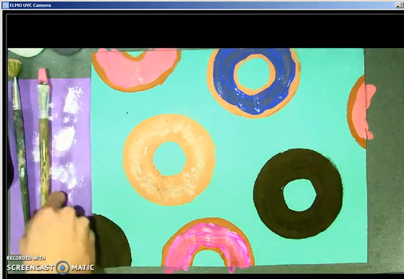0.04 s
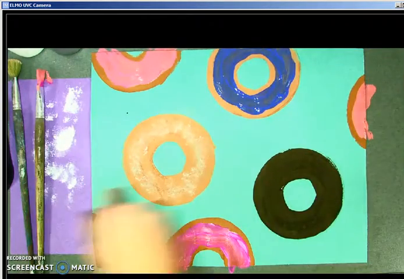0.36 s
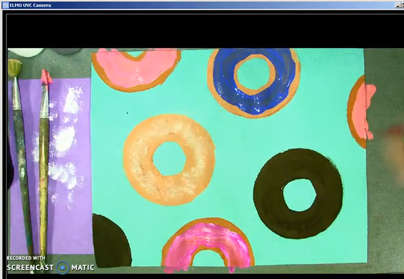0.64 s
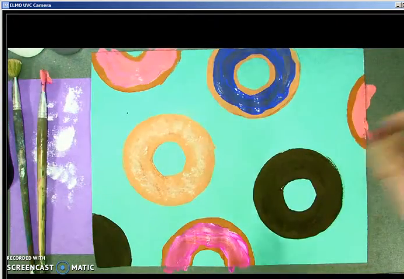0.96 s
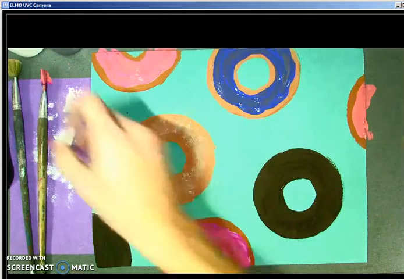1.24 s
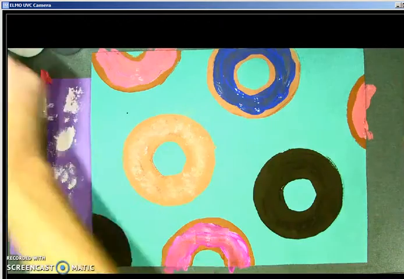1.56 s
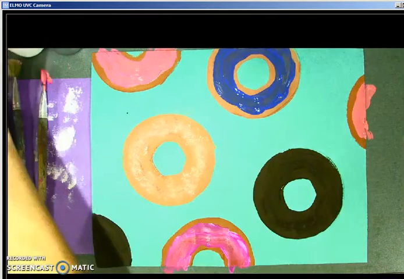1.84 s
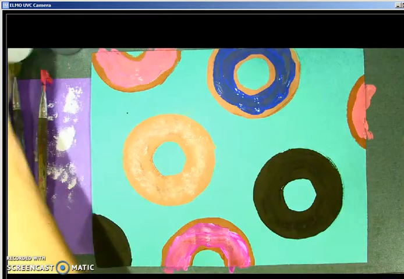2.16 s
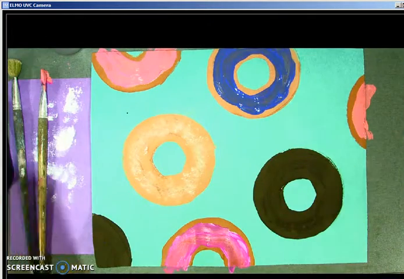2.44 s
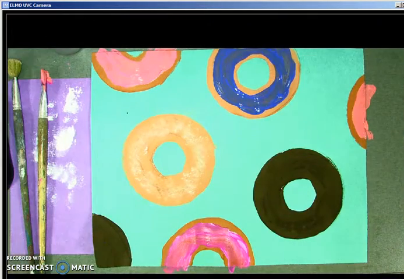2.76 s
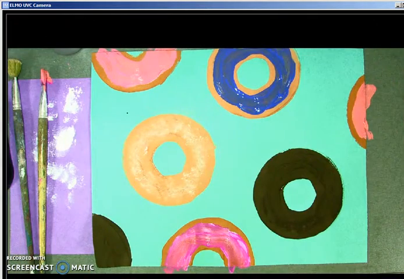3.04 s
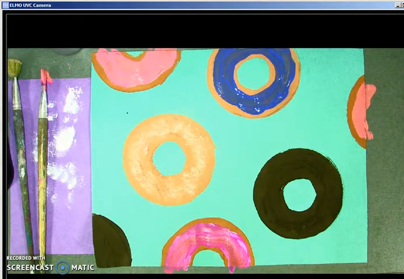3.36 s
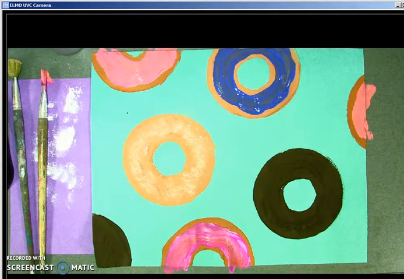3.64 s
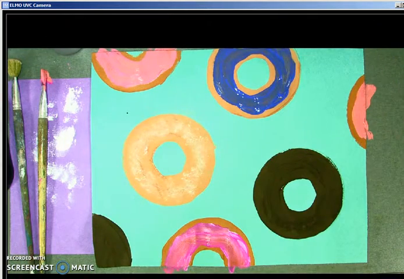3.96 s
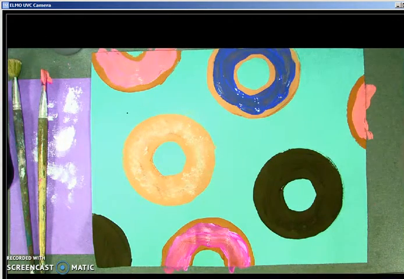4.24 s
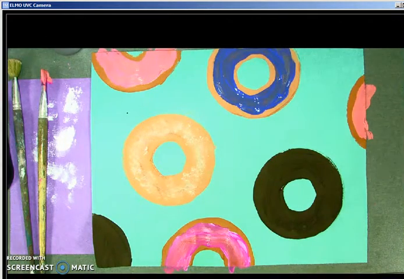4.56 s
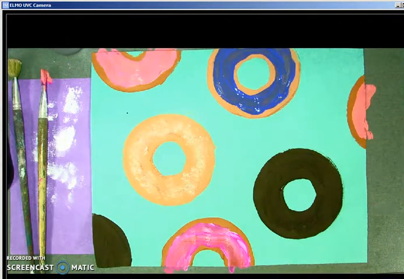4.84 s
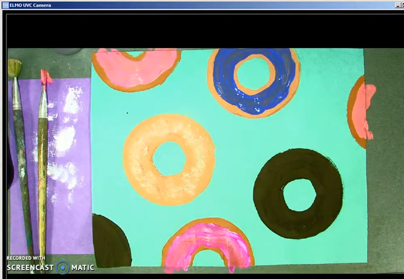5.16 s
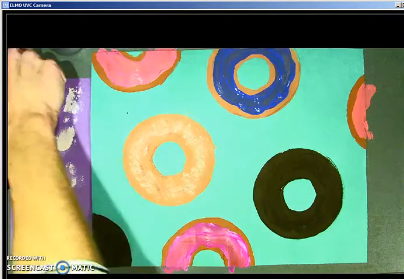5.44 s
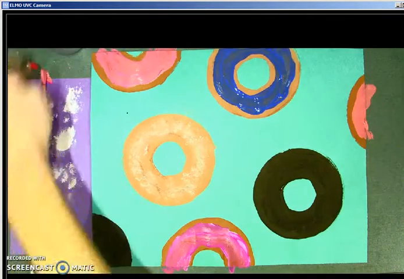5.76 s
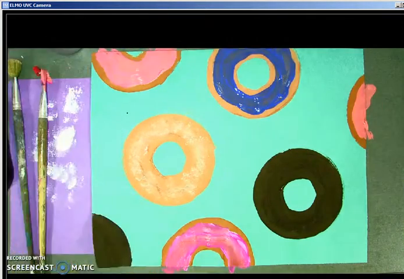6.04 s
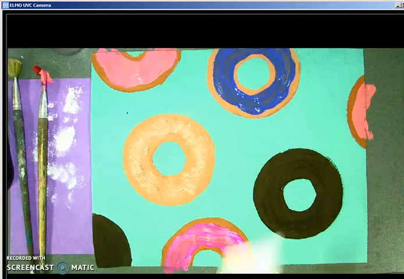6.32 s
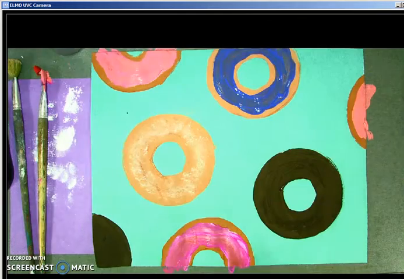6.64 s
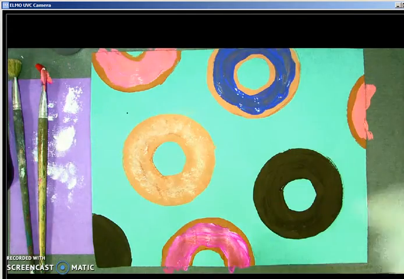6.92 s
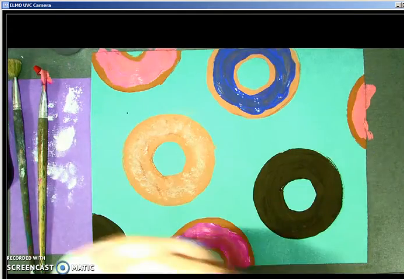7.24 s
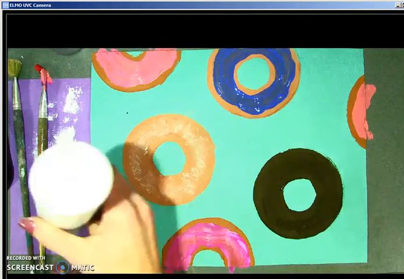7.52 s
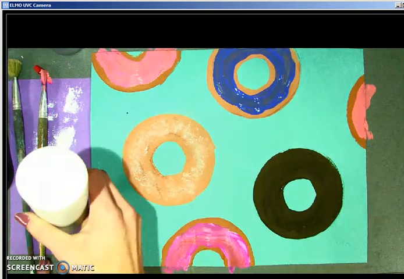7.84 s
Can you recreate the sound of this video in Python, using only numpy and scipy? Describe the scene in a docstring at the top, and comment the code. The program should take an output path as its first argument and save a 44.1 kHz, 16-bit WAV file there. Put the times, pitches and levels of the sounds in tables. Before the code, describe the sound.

Over a low room hum, art supplies are handled on a table with light clicks, a sharp clack, soft booms and one loud knock.

```python
"""Ventilation rumbles from the start, with a faint pulsing whine and the soft boom of a table leant on.
Paintbrushes tick, a handle drops and bounces, and hands slide over paper with a frictional hiss.
Hard pieces scrape and clack; later a hollow container is knocked down, overloading the mono microphone.
Near the end a pot is taken up with a squeak and a pop. Each struck body rings in its damped normal
modes, while the brief contact itself radiates broadband noise."""
import sys
import numpy as np
from scipy import signal
from scipy.fft import rfft, irfft
from scipy.io import wavfile
from scipy.ndimage import uniform_filter1d

SR = 44100
rng = np.random.default_rng(int(sys.argv[2]) if len(sys.argv) > 2 else 0)


def waveform_to_disk(signal):
    """Save audio, clipped to [-1, 1], as 16-bit WAV at the path in sys.argv[1]."""
    frames = np.transpose(np.atleast_2d(signal))
    scaled = np.clip(frames, -1, 1) * 32767
    samples = np.round(scaled).astype(np.int16)
    wavfile.write(sys.argv[1], SR, samples)


N = 356460
TIME = np.arange(N) / SR
RING = TIME[:SR // 4]  # time axis of one blow

# spectrum of moving air and microphone hiss: f/Hz, relative level/dB
AIR_SPECTRUM = [(11, -39), (18, 4), (33, -1.5), (52, -1.5), (63, -7), (86, -3.5), (139, -6), (170, -10.5),
                (196, -16), (232, -14), (422, -19), (529, -17), (1080, -34.5), (6090, -41.5), (8090, -42),
                (8810, -42), (16000, -42)]
# duct resonances: f/Hz, width/Hz, level/dB
DUCT_RESONANCES = [(49, 5.7, -50), (168.7, 16, -60), (537.5, 70, -59.5)]
# arms leaning on the table: t/s, duration/s, boom gain/dB
ARM_LEANS = [(0.048, 1.17, -37.5), (0.654, .11, -28), (2.0, 0.63, -38), (3.534, 0.33, -42.5),
             (4.276, 2.04, -41), (6.07, .46, -27), (6.554, 0.18, -30), (6.79, .33, -37),
             (7.168, 0.39, -44.5)]
# trains of whine pulses: start/s, end/s, period/s
WHINE_TRAINS = [(.028, 4.6, .1447), (4.711, 5.9, .1442), (6.061, 8.05, .144)]
# light ticks of the brushes: t/s, level/dB, centre f/Hz
BRUSH_TICKS = [(0.0662, -45, 4050), (1.1357, -47, 7000), (1.149, -38.5, 9000), (1.2016, -38, 6500),
               (2.795, -46, 3000), (5.2716, -44, 7000), (5.287, -44.5, 7000), (5.3207, -46.5, 3500),
               (5.8048, -37, 3480), (5.8114, -34, 3800), (5.879, -35.5, 4500), (5.885, -42, 2980),
               (5.934, -48, 2500), (5.947, -45, 4000), (7.036, -38.5, 4500), (7.0428, -45, 5500),
               (7.0468, -38.5, 3470), (7.056, -35.5, 3380)]
# soft bumps on the table: t/s, f/Hz, level/dB, Gaussian half-width/s
TABLE_BUMPS = [(0.116, 65, -20, 0.0078), (0.53, 79.5, -24.5, 0.011), (0.998, 77.5, -23.5, 0.028),
               (2.305, 83, -23, 0.017), (3.924, 43.8, -22.5, 0.014), (6.915, 77.5, -28, 0.011),
               (7.349, 323, -35.5, 0.0028)]
# a handle's fall and bounces: t/s, handle level/dB, table level/dB, contact level/dB
HANDLE_TAPS = [(0.2483, -7, -13.5, -31.5), (0.2582, -25, -19, -37), (0.2997, -25.5, -27, -38)]
# modes of the handle and of the table: f/Hz, relative level/dB, T60/s
HANDLE_MODES = [(3082, -9.5, 0.011), (3155, -9, .012), (5720, -2.5, 0.0066)]
TABLE_MODES = [(277, 2, 0.093), (342, 9, 0.073), (768, -7.5, 0.063)]
# strokes over paper: middle t/s, duration/s, level/dB, centre f/Hz
PAPER_STROKES = [(1.516, 0.19, -57, 11500), (1.861, 0.53, -61, 3560), (2.807, 0.18, -59, 4500),
                 (3.015, 0.092, -56, 5430), (4.453, 0.12, -52, 6100), (4.539, 0.71, -59, 4230),
                 (5.991, 0.49, -58, 5400), (6.233, .17, -49.5, 6140), (6.387, 0.11, -52.5, 7500),
                 (6.824, 0.25, -59.5, 4600), (7.723, 0.31, -61, 9050)]
# hard pieces colliding: t/s, level/dB, relative crack level/dB
COLLISIONS = [(2.5617, -29, -8), (2.5805, -27, -7), (2.5843, -22.5, -9), (2.6172, -10.5, -16.5),
              (2.6288, -36.5, -7), (2.6302, -6, 7), (2.6319, -1.5, -3)]
# modes of those pieces: f/Hz, relative level/dB, T60/s
PIECE_MODES = [(812, -10, 0.04), (2880, -10.5, 0.023), (3524, -6, 0.019), (4470, -6.5, 0.021),
               (4950, -5.5, 0.03), (5580, -3, 0.025), (6060, -0.5, 0.009), (7700, -10, 0.02),
               (10300, -9, 0.014)]
# spectrum of their contact: f/Hz, relative level/dB
CLACK_SPECTRUM = [(300, -34.5), (600, -22), (830, -19), (1100, -30), (2200, -20.5), (2900, -7), (3900, -22),
                  (4800, 4), (6200, 5), (8700, -14), (12000, -15.5), (16000, -12)]
# a container landing on one edge, then flat: t/s, body level/dB, crack level/dB
LANDINGS = [(5.0405, -6.5, -20), (5.0427, 5, -2)]
# modes of its hollow body: f/Hz, relative level/dB, T60/s
BODY_MODES = [(507, -0.5, 0.045), (550, 2.5, 0.039), (613, -6.5, 0.06), (776, -10, 0.066)]
# modes of its thin wall: f/Hz, relative level/dB
WALL_MODES = [(3265, -0.5), (4255, 6), (5040, 4), (5300, 3), (5800, 5), (5965, 1), (7745, -5), (9860, -4)]
# spectrum of its contact: f/Hz, relative level/dB
KNOCK_SPECTRUM = [(100, -13), (170, -34), (250, -3), (380, -19), (600, -13), (950, -16), (1600, -17.5),
                  (2200, -20), (3400, -21), (5900, -20), (7000, -28), (10000, -21.5), (16000, -38)]
# pop of a lifted pot, ahead of its cavity filter: t/s, f/Hz, level/dB, Gaussian half-width/s
POT_POP = [(7.0603, 1200, -11, 0.00098)]


def undb(db):
    """Decibels to amplitude ratio."""
    return 10 ** (np.asarray(db) / 20)


def unit(x):
    """Normalisation to rms 1."""
    return x / np.sqrt(np.mean(x ** 2))


def add(out, s, sound):
    """Superposition: a sound joins the mix at time s."""
    i = max(int(s * SR), 0)
    out[i:i + len(sound)] += sound[:N - i]


def edge(x, hz, kind, order=4):
    """Butterworth filtering, low-pass or high-pass."""
    return signal.sosfilt(signal.butter(order, min(hz, .48 * SR), kind, fs=SR, output="sos"), x)


def frequencies(size):
    """Fourier bin frequencies, floored at 1 Hz."""
    return np.maximum(np.fft.rfftfreq(size, 1 / SR), 1)


def noise(points, size):
    """Spectral shaping of white noise by points of f/Hz, level/dB."""
    hz, db = np.transpose(points)
    gain = undb(np.interp(np.log(frequencies(size)), np.log(hz), db))
    return unit(irfft(rfft(rng.standard_normal(size)) * gain, size))


def band(hz, width, size, order=1):
    """Random excitation of a resonance; order 2 steepens the skirts."""
    f = frequencies(size)
    response = 1 / (1 + 1j * (f / hz - hz / f) * hz / width)
    return unit(irfft(rfft(rng.standard_normal(size)) * response ** order, size))


def fade(t60, rise):
    """Impact envelope: growth during contact, then exponential decay."""
    return (1 - np.exp(-RING / rise)) * np.exp(-np.log(1000) * RING / t60)


def ring(modes, rise, detune):
    """Free vibration: a sum of damped modes, slightly detuned at each blow; peak 1."""
    y = np.zeros(len(RING))
    for hz, db, t60 in modes:
        detuned_hz = hz * (1 + detune * rng.standard_normal())
        y += undb(db) * fade(t60, rise) * np.sin(2 * np.pi * detuned_hz * RING)
    y *= 1 - np.exp(-RING / rise)
    return y / np.abs(y).max()


def bursts(rows):
    """Gaussian tone bursts: the shorter the burst, the wider its spectrum."""
    out = np.zeros(N)
    t = RING - RING.mean()
    for s, hz, db, half_width in rows:
        envelope = np.exp(-(t / half_width) ** 2 / 2)
        add(out, s - RING.mean(), undb(db) * envelope * np.cos(2 * np.pi * hz * t))
    return out


def ventilation():
    """Duct resonances colour a steady rumble of air, over microphone hiss."""
    ducts = sum(undb(db) * band(hz, width, N, order=2) for hz, width, db in DUCT_RESONANCES)
    return undb(-41.5) * noise(AIR_SPECTRUM, N) + ducts


def arm_weight(attack_s=0.035, release_s=0.047, resting_db=-46.5):
    """Incoherent addition: leans build, hold and let go, and their powers sum."""
    power = undb(resting_db) ** 2
    for s, length, db in ARM_LEANS:
        press = np.clip((TIME - s) / attack_s, 0, 1)
        release = np.clip(1 - (TIME - s - length) / release_s, 0, 1)
        power += (undb(db) * press * release) ** 2
    return np.sqrt(power)


def table_boom(hz, waver_hz, flutter_db):
    """Forced vibration: moving arms keep the table's lowest mode ringing unevenly, amid rumble."""
    weight = arm_weight() * undb(flutter_db * band(7, 8, N, order=2))
    phase = 2 * np.pi * np.cumsum(hz + waver_hz * band(8.7, 12, N, order=2)) / SR
    tone = np.sqrt(2) * (np.sin(phase) + undb(-18.5) * np.sin(2 * phase))
    rumble = undb(-14) * band(111, 82, N, order=2) + undb(-7.5) * band(41, 22, N, order=2)
    return weight * (undb(-2) * tone + rumble)


def whine(hz, db, pulse_s, jitter_s):
    """Gating of a pure tone: a thin electronic whine in slightly uneven pulses."""
    out = np.zeros(N)
    pulse = undb(db) * np.sin(2 * np.pi * hz * TIME[:int(pulse_s * SR)])
    for start, end, period in WHINE_TRAINS:
        for s in np.arange(start, end, period):
            add(out, s + jitter_s * rng.standard_normal(), pulse)
    return out


def brush_ticks():
    """Heavy damping leaves light contacts unpitched; higher ones reach further into the treble."""
    out = np.zeros(N)
    for s, db, hz in BRUSH_TICKS:
        click = edge(band(hz, 1.9 * hz, len(RING)), 8000 + 0.72 * hz, "low", order=8)
        add(out, s, undb(db) * click * fade(0.026, 0.000073))
    return out


def table_bumps():
    """A soft contact excites only low frequencies, for a few cycles."""
    return bursts(TABLE_BUMPS)


def brush_taps():
    """Impact excites the handle's bending modes; the heavier table answers a moment later."""
    out = np.zeros(N)
    for s, handle_db, table_db, contact_db in HANDLE_TAPS:
        contact = edge(band(3500, 5000, len(RING)), 6800, "low", order=2) * fade(0.05, 0.000098)
        handle = ring(HANDLE_MODES, rise=0.016, detune=0.0024)
        table = edge(ring(TABLE_MODES, rise=0.0015, detune=0.0032), 202, "high")
        add(out, s, undb(handle_db) * handle)
        add(out, s + 0.00051, undb(contact_db) * contact)
        add(out, s + 0.00295, undb(table_db) * table)
    return out


def paper_slides(grain_db):
    """Friction: skin catches on paper fibres, and a grainy hiss swells and fades with each stroke."""
    out = np.zeros(N)
    for middle, length, db, hz in PAPER_STROKES:
        size = int(length * SR)
        stroke = np.sin(np.linspace(0, np.pi, size))
        grain = undb(grain_db * unit(uniform_filter1d(rng.standard_normal(size), size=130)))
        hiss = band(hz, 2 * hz, size, order=2)
        add(out, middle - length / 2, undb(db) * stroke * grain * hiss)
    return edge(out, 11300, "low", order=2)


def clacks():
    """Brief, hard contact excites high modes: small touches lead up to a sharp double clack."""
    out = np.zeros(N)
    for s, db, crack_db in COLLISIONS:
        crack = undb(crack_db) * noise(CLACK_SPECTRUM, len(RING)) * fade(t60=0.0064, rise=0.0001)
        body = edge(ring(PIECE_MODES, rise=0.0001, detune=0.0042), 650, "high")
        add(out, s, undb(db) * (undb(-4) * body + crack))
    return out


def scrape(start_db, end_db):
    """Stick-slip friction: between touches, tiny slips ring the pieces' modes ever harder."""
    start, end = COLLISIONS[0][0], COLLISIONS[-1][0]
    size = int((end - start) * SR)
    slips = rng.standard_normal(size) * (rng.random(size) < 0.05)
    force = slips * undb(np.linspace(start_db, end_db, size))
    body = ring(PIECE_MODES, rise=0.0001, detune=0.0074)
    out = np.zeros(N)
    add(out, start, signal.fftconvolve(force, body / np.linalg.norm(body)))
    return out


def swish(db, t60, hollow_db):
    """Exponential growth: a short, hollow noise swells into the knock."""
    out = np.zeros(N)
    hiss = edge(noise(KNOCK_SPECTRUM, len(RING)), 9600, "low", order=1)
    hollow = undb(hollow_db) * band(500, 360, len(RING), order=2)
    swell = fade(t60, rise=0.0007)[::-1]
    add(out, LANDINGS[0][0] - RING[-1], undb(db) * (hiss + hollow) * swell)
    return out


def container_knock(wall_t60, thud_db):
    """A small hollow body radiates little bass; the hand damps its wall and the table thuds below."""
    out = np.zeros(N)
    damped_wall = [(hz, db, wall_t60) for hz, db in WALL_MODES]
    for s, body_db, crack_db in LANDINGS + rattle(count=4):
        crack = noise(KNOCK_SPECTRUM, len(RING)) * fade(t60=0.034, rise=0.00063)
        wall = undb(-1.5) * ring(damped_wall, rise=0.00037, detune=0.0035)
        body = edge(ring(BODY_MODES, rise=0.00085, detune=0.003), 460, "high", order=6)
        add(out, s, undb(body_db) * body + undb(crack_db) * (crack + wall))
    add(out, LANDINGS[-1][0], undb(thud_db) * ring(TABLE_MODES, rise=0.00084, detune=0.003))
    return out


def rattle(count, gap_s=0.0058, body_db=-31, crack_db=-14.5, step_db=-4.5):
    """Dissipation weakens each contact as the container settles; rows as in LANDINGS."""
    first = LANDINGS[-1][0] + gap_s
    return [(first + k * gap_s, body_db + k * step_db, crack_db + k * step_db) for k in range(count)]


def pot_squeak(hz, waver_hz, db, rise_s, fall_s):
    """Cavity resonance confines to one narrow band a wavering squeak that swells into a pop."""
    t = TIME - POT_POP[0][0]
    swell = np.exp(-(t / np.where(t < 0, rise_s, fall_s)) ** 2 / 2)
    phase = 2 * np.pi * np.cumsum(hz + waver_hz * band(88, 124, N, order=2)) / SR
    squeak = undb(db) * swell * np.sin(phase)
    f = frequencies(N)
    low_hz, high_hz = 1056, 1540
    cavity = 1 / np.sqrt((1 + (low_hz / f) ** 40) * (1 + (f / high_hz) ** 40))
    return irfft(rfft(bursts(POT_POP) + squeak) * cavity, N)


def room(x, db, t60):
    """Reverberation: the classroom adds a faint diffuse tail to the direct sound."""
    tail = band(1670, 8200, len(RING)) * fade(t60, rise=0.0027)
    return x + undb(db) * signal.fftconvolve(x, tail / np.linalg.norm(tail))[:N]


def scene():
    """Superposition of all sources at one point just above the table."""
    background = ventilation() + whine(hz=8010, db=-58.5, pulse_s=0.022, jitter_s=0.0056)
    boom = table_boom(hz=79.85, waver_hz=2, flutter_db=1) + table_bumps()
    handling = brush_ticks() + brush_taps() + clacks() + scrape(start_db=-40.5, end_db=-17.5)
    handling += container_knock(wall_t60=0.037, thud_db=-19.5)
    handling += pot_squeak(hz=1335, waver_hz=55, db=-23, rise_s=0.011, fall_s=0.0068)
    hisses = paper_slides(grain_db=2.1) + swish(db=-30, t60=0.17, hollow_db=4)
    return (background + boom + room(handling, db=-26.5, t60=0.2) + hisses)[None]


def record(dry):
    """Saturation: the microphone input rounds off the loudest blows, and a low-pass cuts the top."""
    ceiling, top_hz = 0.88, 15900
    clipped = dry / (1 + np.abs(dry / ceiling) ** 6) ** (1 / 6)
    return signal.sosfilt(signal.ellip(10, 0.2, 70, top_hz, fs=SR, output="sos"), clipped)


dry = scene()
out = record(dry)
waveform_to_disk(out)
```